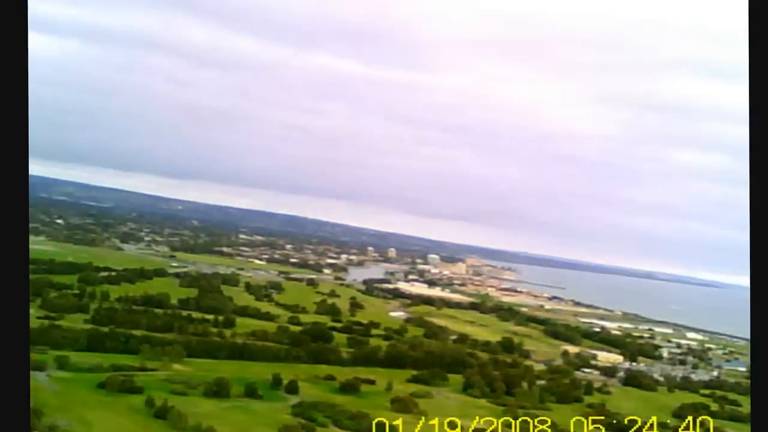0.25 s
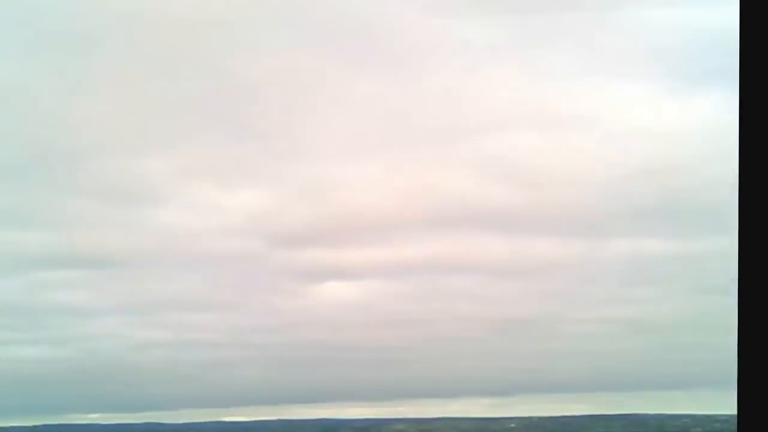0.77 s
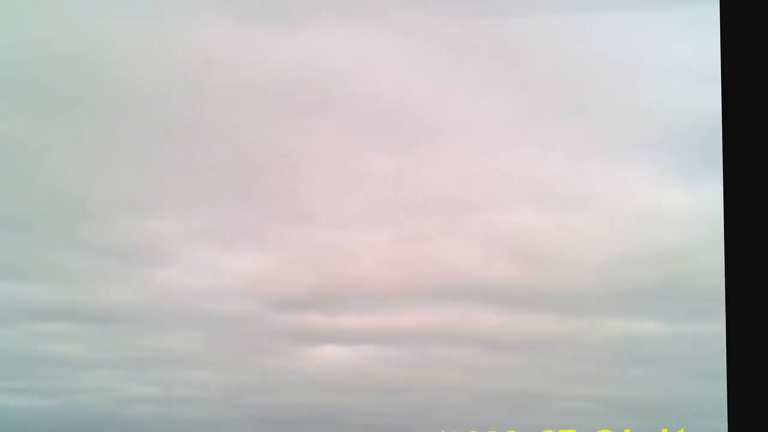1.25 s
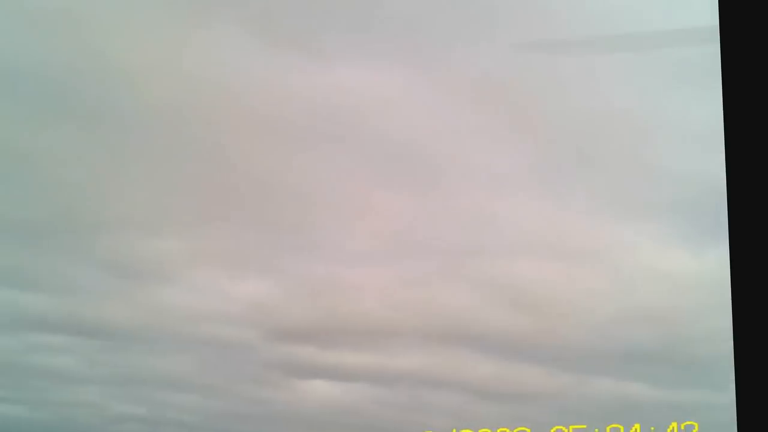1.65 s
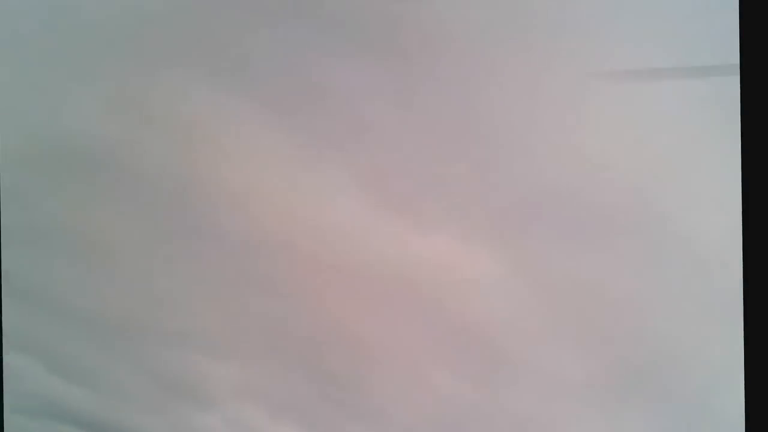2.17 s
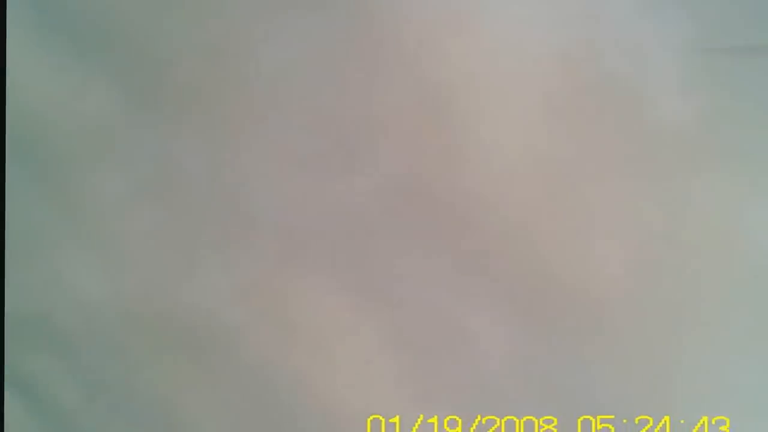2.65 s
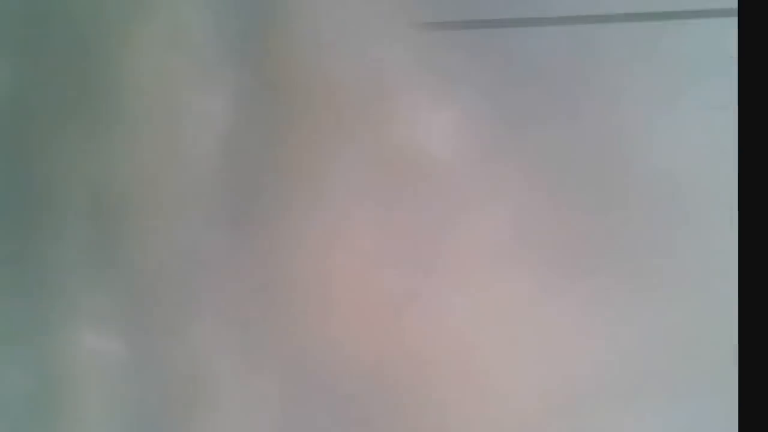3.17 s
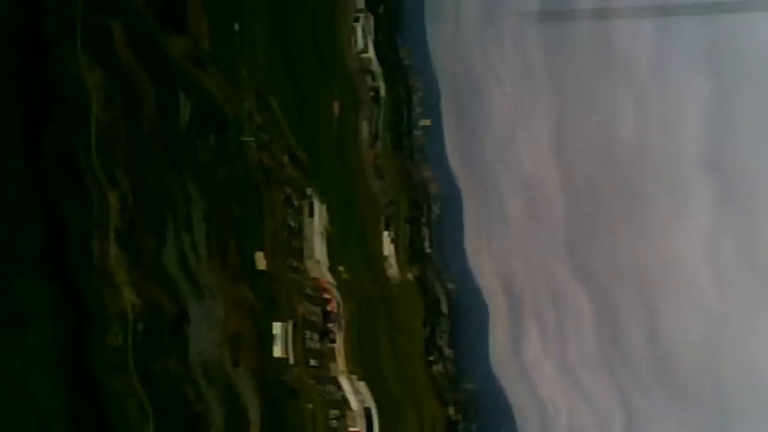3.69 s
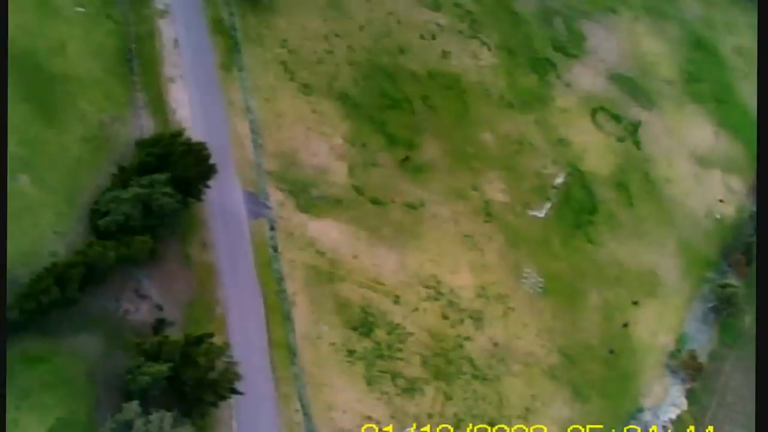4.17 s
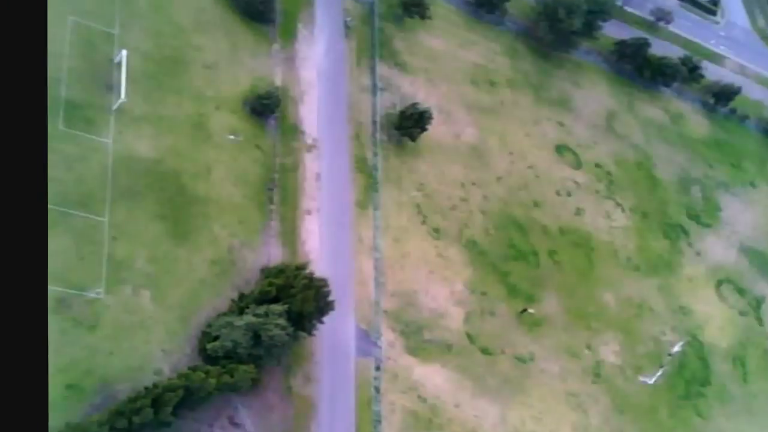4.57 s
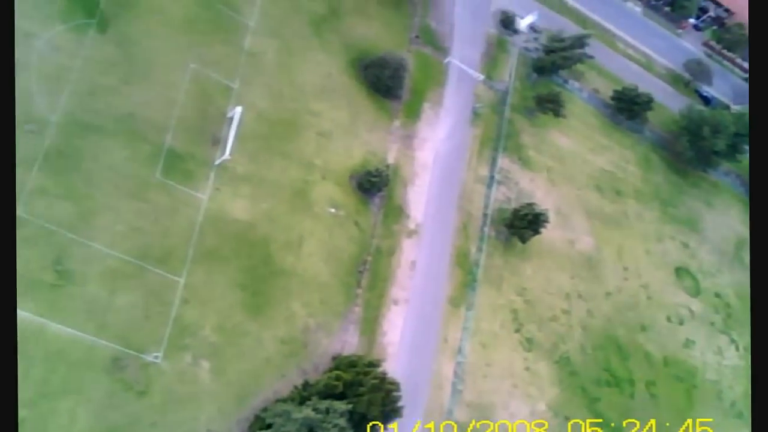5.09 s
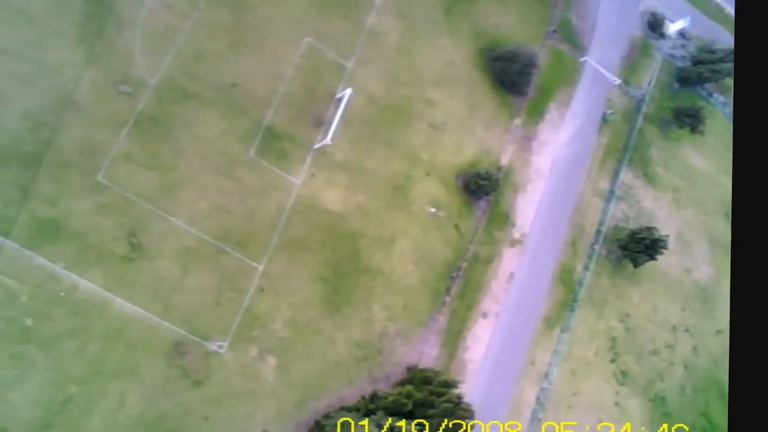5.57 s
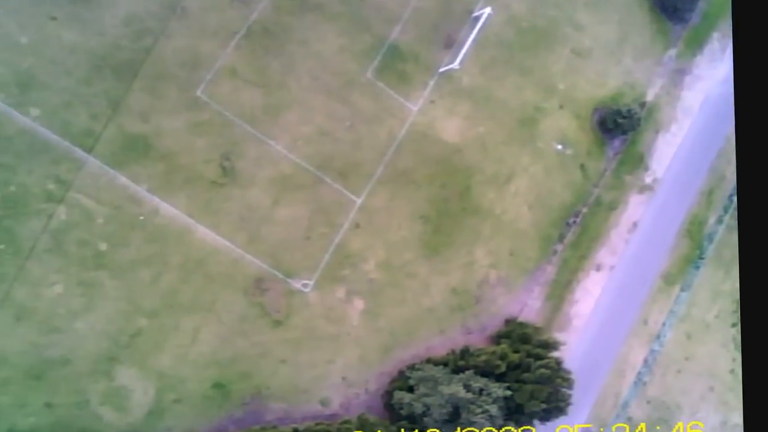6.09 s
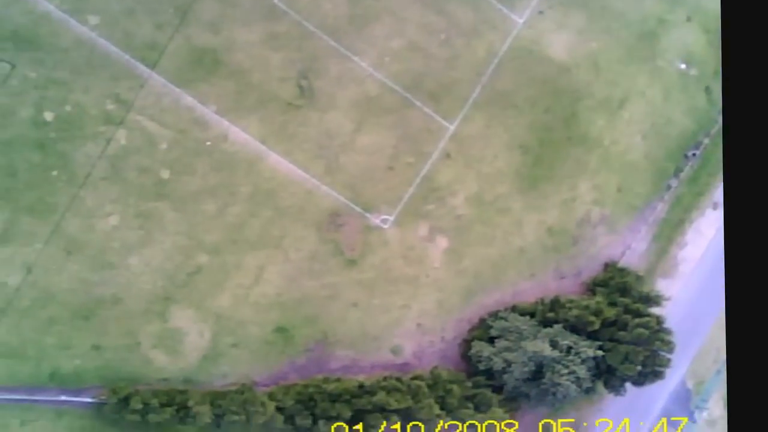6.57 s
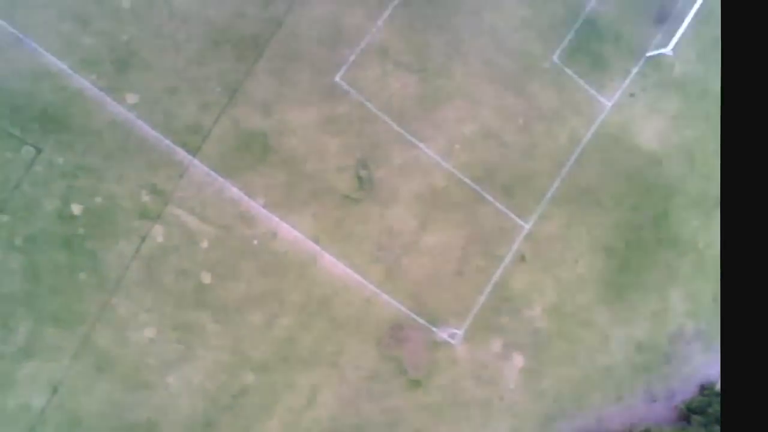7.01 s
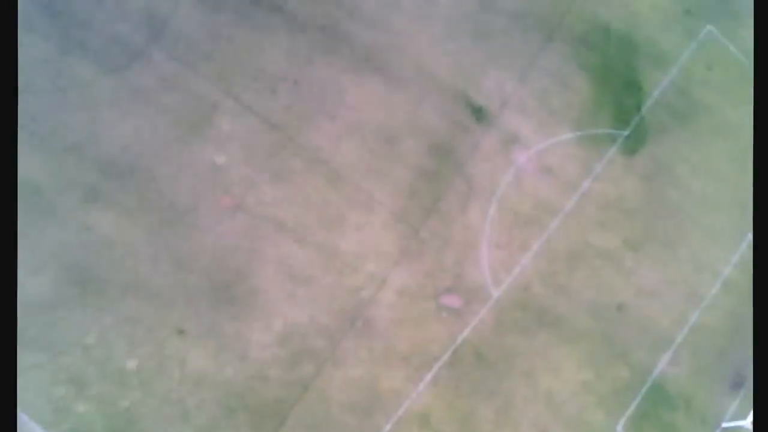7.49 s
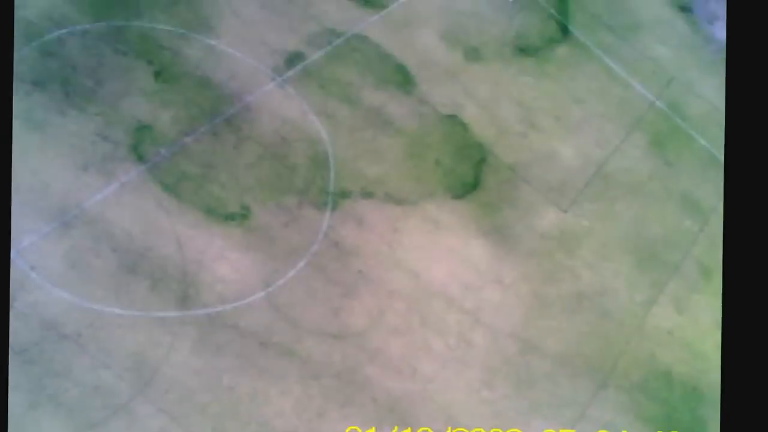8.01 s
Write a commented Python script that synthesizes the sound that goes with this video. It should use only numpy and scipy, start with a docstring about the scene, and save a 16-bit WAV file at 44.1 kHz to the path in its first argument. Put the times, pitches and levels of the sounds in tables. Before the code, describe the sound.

A small electric model airplane is heard in flight from a microphone on its own body. From the start, the propeller gives a low, even hum, with a faint motor whine, a thin, very high whistle and soft rushing air. A light gust rumbles on the microphone at about 1.4 seconds. From 2.3 seconds the hum swells and the airframe shakes with a low flutter, strongest near 3 seconds. Between 3.1 and 3.8 seconds the blades chop and swish roughly over the loud hum. Just after 4 seconds the shaking stops and the hum turns quieter and thinner. The plane then dives: the propeller buzz regains strength and climbs smoothly in pitch until about 8 seconds, while from 5 seconds the wind grows louder and brighter. The high whistle continues throughout, slightly softer in the dive.

```python
"""The two-blade propeller of a small electric model airplane, heard from a camera on its own airframe.
It hums and chops the air as the plane climbs, then swishes and shakes the frame over the top.
The motor's magnets whine, and the speed controller makes the windings whistle near 8 kHz.
In the dive the propeller unloads and speeds up while the air rushes harder past the microphone."""
import sys
import numpy as np
from scipy import signal
from scipy.fft import rfft, irfft
from scipy.io import wavfile
from scipy.ndimage import uniform_filter1d

SR = 44100
rng = np.random.default_rng(int(sys.argv[2]) if len(sys.argv) > 2 else 0)


def unload_wav(signal):
    """Save mono or channel-first audio to the path in sys.argv[1] as 16-bit WAV at rate SR, clipped to [-1, 1]."""
    wavfile.write(
        sys.argv[1],
        SR,
        np.round(np.clip(np.atleast_2d(signal).T, -1, 1) * 32767).astype(np.int16),
    )


N = 363825


def undb(db):
    """Decibels to gain."""
    return 10 ** (np.asarray(db) / 20)


def curves(table):
    """One envelope per value column of a time table, in straight ramps."""
    times, *columns = np.transpose(table)
    return [np.interp(np.arange(N) / SR, times, column) for column in columns]


def wobble(rate_hz):
    """Smooth random modulation: sample-and-hold, slewed twice, with a spread of 1."""
    hold = max(int(SR / rate_hz), 2)
    steps = np.repeat(rng.standard_normal(N // hold + 1), hold)
    slewed = uniform_filter1d(uniform_filter1d(steps, hold), hold)[:N]
    return slewed / slewed.std()


def colour(white, hz, db):
    """EQ white noise to a curve of densities in dB per Hz."""
    f = np.maximum(np.fft.rfftfreq(N, 1 / SR), 1)
    gain = undb(np.interp(np.log(f), np.log(hz), db)) * np.sqrt(SR / 2)
    return irfft(rfft(white) * gain, N)


def angle(hz):
    """Running phase of a gliding frequency."""
    return 2 * np.pi * np.cumsum(hz) / SR


def tone(phase, db):
    """A sinusoid of the given rms level."""
    return np.sqrt(2) * undb(db) * np.cos(phase)


def blade_pulse(shaft, depth):
    """A swell for each passing blade, at unit power."""
    pulse = np.exp(depth * np.cos(2 * shaft))
    return pulse / np.sqrt(np.mean(pulse ** 2))


def air_rush(shaft, airspeed, buffet_db=0.5, flicker_db=0.25):
    """Turbulence buffets the microphone; the hiss above it pulses with the propeller wash."""
    # air noise through the camera housing: f/Hz, slow-flight density/(dB per Hz), dive density/(dB per Hz)
    air_spectrum = [(25, -42.3, -35.5), (80, -42.5, -38), (140, -49.7, -39.5), (290, -55.3, -48),
                    (550, -59.7, -51.3), (2150, -65.5, -57.1), (3000, -76, -64.3), (3850, -75.2, -65.5),
                    (4900, -86.7, -73.7), (6150, -79, -67.6), (7250, -87.3, -75.7), (8350, -74.7, -65),
                    (9400, -85, -70.5), (10700, -93, -79)]
    # stronger gusts on the microphone: t/s, half length/s, rumble boost/dB
    gusts = [(.65, 0.22, 0.5), (1.362, 0.14, 3.5), (5.724, 0.15, 1.5), (6.583, 0.037, 3)]
    white = rng.standard_normal(N)
    hz, slow_db, dive_db = np.transpose(air_spectrum)
    slow, dive = colour(white, hz, slow_db), colour(white, hz, dive_db)
    # the level rises evenly in dB with airspeed while the colour brightens
    rise = np.std(dive) / np.std(slow)
    rush = rise ** airspeed * ((1 - airspeed) * slow + airspeed * dive / rise)
    rumble = signal.sosfiltfilt(signal.butter(2, 300, fs=SR, output="sos"), rush)
    hiss = (rush - rumble) * blade_pulse(shaft, depth=0.18)
    t = np.arange(N) / SR
    gust_db = sum(db * np.exp(-((t - peak_s) / half_s) ** 2) for peak_s, half_s, db in gusts)
    return rumble * undb(gust_db + buffet_db * wobble(22)) + hiss * undb(flicker_db * wobble(50))


def controller_whistle(shaft, switch_hz, whistle_db, airspeed, stall):
    """Switched current makes the windings whistle; the turning rotor adds side tones."""
    # side tones: offset/shaft rates, slow-flight level/dB, dive level/dB (both re the whistle),
    # added gain at full stall
    side_tones = [(-21, -35, -35, 0), (-6, -42, -40, 0), (-2, -29, -30, 7), (2, -27, -20, 2.5),
                  (4, -14, -10.5, -.6), (6, -16, -12.5, -.15), (8, -19.5, -17, .1), (10, -24.5, -22, .5),
                  (12, -33, -30, .1), (14, -32, -37, -.4), (21, -40, -42, 0)]
    carrier = angle(switch_hz + 2 * wobble(150))
    carrier_db = whistle_db + 0.1 * wobble(60)
    whistle = tone(carrier, carrier_db)
    for offset, slow_db, dive_db, stall_gain in side_tones:
        # the upper tones run in step and add up to one pip per blade; the lower ones lag a quarter cycle
        phase = carrier + offset * shaft - np.pi / 2 * (offset < 0)
        side_db = slow_db + (dive_db - slow_db) * airspeed
        whistle += (1 + stall_gain * stall) * tone(phase, carrier_db + side_db)
    return whistle


def motor_whine(shaft, airspeed, flutter_db=0.5):
    """Magnets whine as they pass the stator, fading as the dive takes the load off."""
    # partials of the 14-pole motor: f/shaft rate, slow-flight level/dB, dive level/dB
    partials = [(21, -46, -53), (28, -60, -66), (42, -43.5, -58), (56, -64, -74), (63, -69, -74),
                (70, -66, -72), (84, -61, -74)]
    return sum(tone(order * shaft, slow_db + (dive_db - slow_db) * airspeed + flutter_db * wobble(30))
               for order, slow_db, dive_db in partials)


def airframe_shake(shaft, shake_db, flutter_db=0.5, wander_rad=0.38):
    """Unequal blades shake the airframe at odd multiples of the shaft rate."""
    # partials of the shaking: f/shaft rate, level/dB re shake_db
    partials = [(1, 1), (3, 0), (5, -15), (7, -22), (9, -21), (11, -20), (13, -20)]
    shake = np.zeros(N)
    for order, db in partials:
        # a quarter cycle off the blade tone, so the blade pulses come early and late in turn
        phase = order * shaft - np.pi / 2 + wander_rad * wobble(20)
        shake += tone(phase, shake_db + db + flutter_db * wobble(15))
    return shake


def blade_swish(shaft, stall, shake_db):
    """Stalled or shaking blades shed a burst of eddies on every pass."""
    # eddy noise at unit strength: f/Hz, density/(dB per Hz)
    eddy_spectrum = [(100, -65), (350, -51), (750, -57), (1300, -60.5), (2200, -68.5), (3500, -75.5),
                     (5000, -90), (9000, -100)]
    hz, db = np.transpose(eddy_spectrum)
    eddies = colour(rng.standard_normal(N), hz, db)
    strength = np.hypot(stall, undb(shake_db + 14))
    return strength * eddies * blade_pulse(shaft, depth=0.9)


def propeller_hum(shaft, airspeed, stall, flutter_db=0.1, upper_flutter_db=1.0, wander_rad=0.12):
    """Each blade sends a suction pulse; gusts make its partials flutter and stray."""
    # body of the hum as the inflow changes: t/s, level/dB of blade harmonics 1, 2 and 3
    harmonic_levels = [(0, -18.5, -46, -42), (.35, -16, -42, -34.5), (.7, -18.5, -34, -34.5),
                       (1, -21, -30.5, -36.5), (1.4, -24.5, -33, -35), (1.8, -23, -34, -35),
                       (2.05, -25.5, -32, -43.5), (2.3, -17, -32, -34.5), (2.5, -13, -41, -43),
                       (2.75, -10.5, -32, -37.5), (3, -10.5, -34, -31), (3.15, -9.5, -26.5, -32),
                       (3.27, -9.5, -22, -34), (3.35, -9, -17, -27), (3.41, -11.5, -28, -21),
                       (3.45, -11, -29, -34), (3.5, -11, -23, -40), (3.55, -9.5, -19, -34),
                       (3.63, -9.5, -17.5, -27), (3.7, -8.5, -19, -42), (3.75, -8, -22, -36),
                       (3.8, -8.5, -36, -33), (3.96, -10.5, -22, -36.5), (4.1, -20, -40, -29),
                       (4.25, -26, -26.5, -34), (4.4, -36, -22.5, -37), (4.6, -26, -28, -39),
                       (4.8, -25.5, -29, -31.5), (5.1, -22.5, -26.5, -35.5), (5.4, -22, -27, -38),
                       (5.7, -17.5, -27.5, -34), (6, -19, -31.5, -32), (6.3, -17, -24.5, -29.5),
                       (6.6, -17.3, -25, -30), (6.9, -15.5, -20.5, -29), (7.15, -18.5, -24, -27),
                       (7.4, -17.5, -25.5, -29), (7.7, -18.3, -27, -28), (8, -16, -26, -28.5),
                       (8.25, -19, -23.5, -27.5)]
    # weaker partials: f/shaft rate, slow-flight level/dB, dive level/dB, full-stall level/dB
    partials = [(5, -46, -37, -38), (7, -46, -39, -41), (8, -47.5, -37.5, -27), (9, -54, -46, -40),
                (10, -53, -44, -33), (12, -57, -48, -37), (13, -44, -47, -51), (14, -52, -52, -42)]
    first_db, second_db, third_db = curves(harmonic_levels)
    suction = tone(2 * shaft, first_db - flutter_db * wobble(25))
    for order, db in ((4, second_db), (6, third_db)):
        phase = order * shaft + wander_rad * wobble(25)
        suction += tone(phase, db + upper_flutter_db * wobble(20))
    for order, slow_db, dive_db, stall_db in partials:
        flight_gain = undb(slow_db + (dive_db - slow_db) * airspeed)
        gain = np.hypot(flight_gain, stall ** 2 * undb(stall_db))
        phase = order * shaft + wander_rad * wobble(25)
        suction += gain * tone(phase, upper_flutter_db * wobble(20))
    return -suction


def scene():
    """One shaft ties the layers together; airspeed and stall ride their balance."""
    # electric drive: t/s, blade rate/Hz, switching rate/Hz, whistle level/dB
    drive_cues = [(0.0, 168.0, 8091, -25.7), (0.3, 167.4, 8091, -26.0), (0.6, 166.7, 8090, -25.4),
                  (0.9, 166.2, 8090, -25.3), (1.2, 165.5, 8090, -25.0), (1.6, 165.0, 8089, -25.0),
                  (2.0, 164.7, 8088, -25.2), (2.4, 164.7, 8087, -25.4), (2.8, 164.8, 8086, -25.6),
                  (3.2, 165.0, 8085, -26.2), (3.5, 164.7, 8085, -26.2), (3.8, 164.5, 8085, -26.5),
                  (4.0, 166.2, 8084, -27.4), (4.3, 170.5, 8082, -28.3), (4.7, 174.4, 8080, -28.1),
                  (5.1, 178.9, 8078, -28.2), (5.5, 183.2, 8076, -29.0), (5.9, 188.6, 8075, -29.3),
                  (6.3, 195.3, 8073, -29.2), (6.7, 201.9, 8071, -29.7), (7.0, 206.6, 8071, -29.9),
                  (7.3, 210.5, 8070, -29.6), (7.6, 213.0, 8068, -29.6), (7.9, 214.3, 8068, -29.3),
                  (8.25, 212.5, 8069, -30.2)]
    # pace of the flight: t/s, airspeed (0 = top of the climb, 1 = full dive)
    airspeed_cues = [(0, 0.073), (.5, 0.095), (1, 0.032), (2, .02), (2.8, 0.075), (3.4, 0.13), (4.2, 0.045),
                     (4.6, 0.11), (5, 0.27), (5.5, 0.45), (6, 0.59), (6.5, 0.75), (7, 0.9), (7.5, 0.96),
                     (8.25, 0.99)]
    # blades meeting the air askew over the top: t/s, stall (0 to 1)
    stall_cues = [(0, 0), (3.1, 0), (3.16, 0.57), (3.25, 0.54), (3.31, 0.77), (3.42, 0.87), (3.5, 0.63),
                  (3.63, 0.74), (3.77, 0.74), (3.83, 0.08), (4.5, 0.16), (5.8, 0.13)]
    # airframe shaking: t/s, level/dB
    shake_cues = [(0, -38.5), (2.1, -40.5), (2.35, -28.5), (2.65, -26), (2.95, -20.5), (3.2, -25),
                  (3.35, -31), (3.75, -30), (4.05, -42.5), (8.25, -35.5)]
    blade_hz, switch_hz, whistle_db = curves(drive_cues)
    airspeed = curves(airspeed_cues)[0]
    stall = curves(stall_cues)[0]
    shake_db = curves(shake_cues)[0]
    shaft = angle(blade_hz / 2 * (1 + 0.0005 * wobble(14)))  # two blades pass per turn
    mix = propeller_hum(shaft, airspeed, stall)
    mix += airframe_shake(shaft, shake_db)
    mix += blade_swish(shaft, stall, shake_db)
    mix += motor_whine(shaft, airspeed)
    mix += controller_whistle(shaft, switch_hz, whistle_db, airspeed, stall)
    mix += air_rush(shaft, airspeed)
    return mix[None]


def record(dry):
    """The small camera drops the deepest rumble, rounds the highest peaks and cuts the top."""
    low_cut_hz, high_cut_hz, ceiling = 8, 10500, 0.97
    trimmed = signal.sosfilt(signal.butter(1, low_cut_hz, "high", fs=SR, output="sos"), dry)
    rounded = trimmed / (1 + (trimmed / ceiling) ** 10) ** (1 / 10)
    return signal.sosfilt(signal.cheby1(12, 0.2, high_cut_hz, fs=SR, output="sos"), rounded)


dry = scene()
out = record(dry)
unload_wav(out)
```